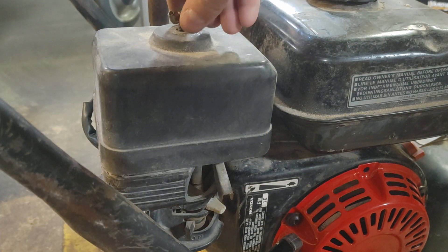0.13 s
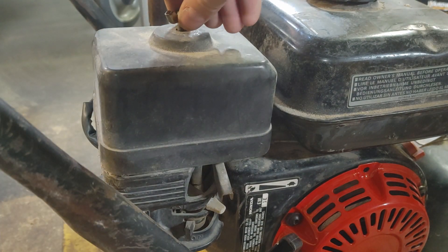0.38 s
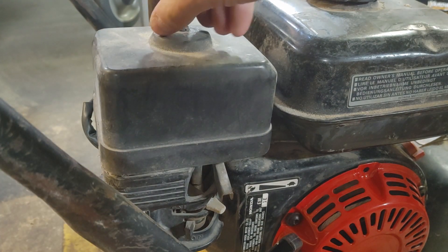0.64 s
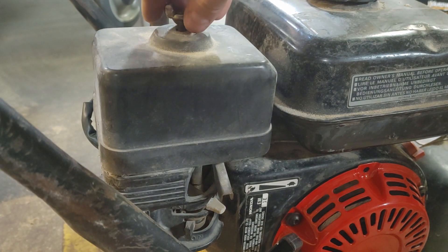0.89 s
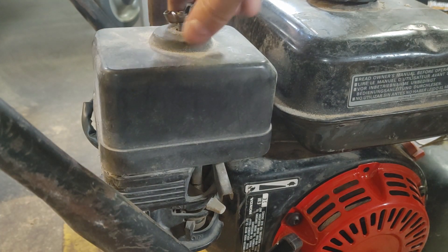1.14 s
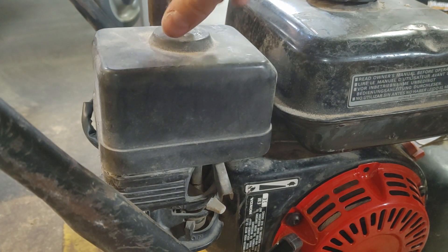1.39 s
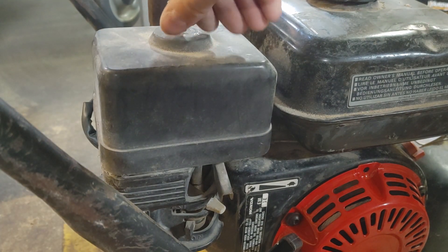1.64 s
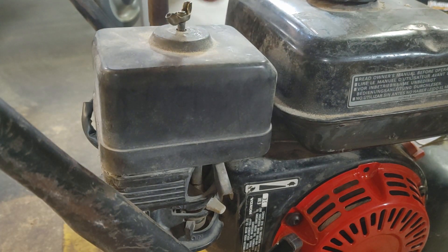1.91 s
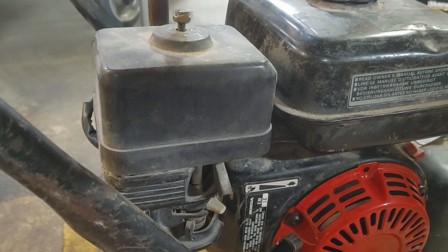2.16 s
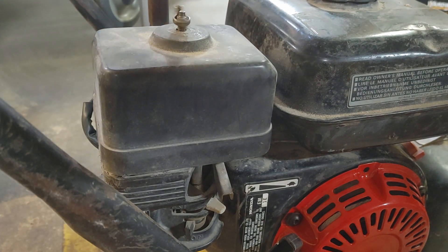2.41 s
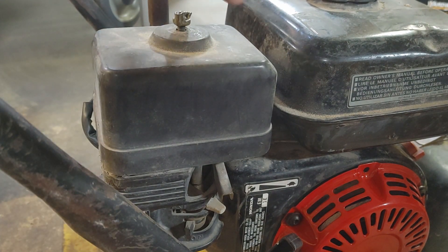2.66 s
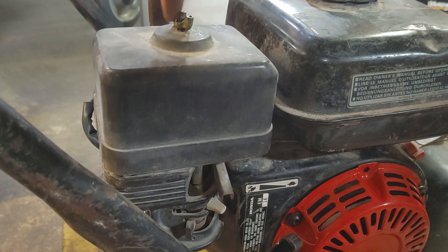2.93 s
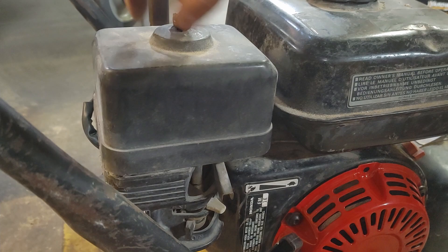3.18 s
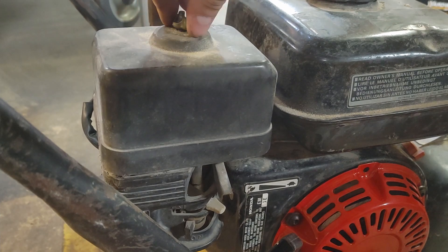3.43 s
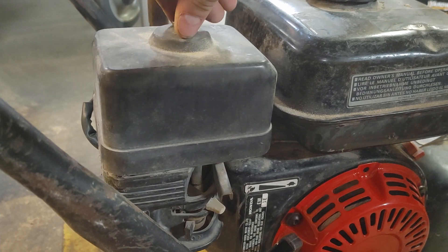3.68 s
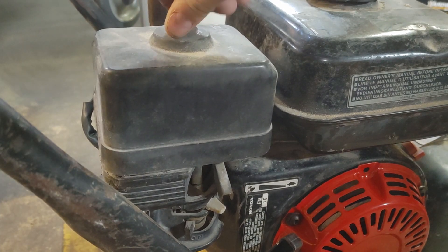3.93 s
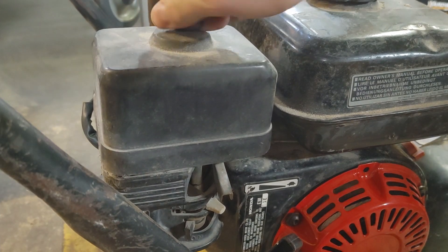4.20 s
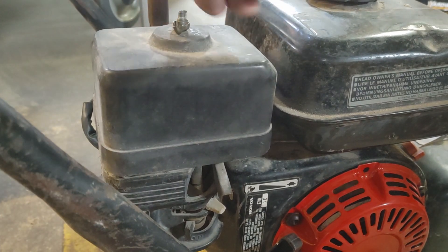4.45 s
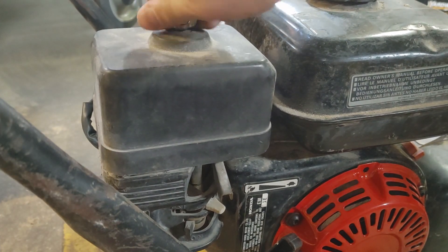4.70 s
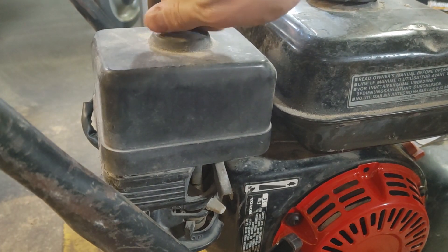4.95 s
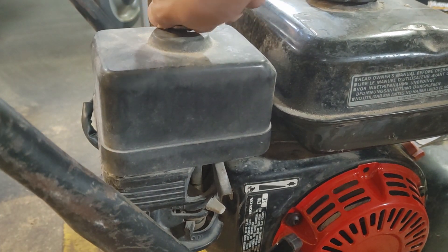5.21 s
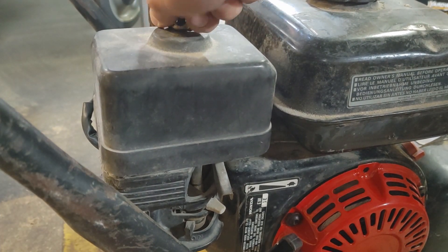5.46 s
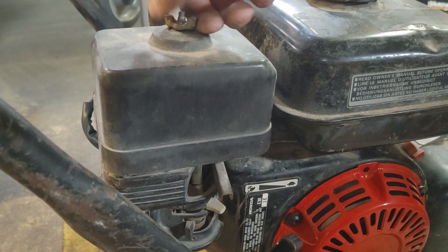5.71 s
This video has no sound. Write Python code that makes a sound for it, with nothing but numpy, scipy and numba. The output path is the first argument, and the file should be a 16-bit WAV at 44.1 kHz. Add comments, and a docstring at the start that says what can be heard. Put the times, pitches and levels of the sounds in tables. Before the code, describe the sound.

A close stereo pickup in a quiet workshop, with a low, slowly wavering murmur and faint steady hiss throughout. Faint skin rubbing opens, then a sharp metallic click at 0.8 s, followed by a weaker one at 0.9. From 1.15 to 1.85 s come small irregular ticks with thin rattles as a loose wing nut spins on its stud. The strongest clack lands at 2.1 s, ringing briefly around mid pitch with dying chatter; clusters of ticks follow at 2.3, 2.5, 2.75 and 3.0 s, with tiny gritty thread squeaks. From 3.3 s the gripping hand makes softer rubs and dull taps on the hollow plastic cover, with muffled low bumps near 3.85 and 4.17 s. Rubs and taps gather at 4.2, then a firmer scraping knock at 4.7 s. Faint rubs near 5.1 and a light tap at 5.6 s end it. Echoes are short and diffuse.

```python
"""Wing nut on a filter cover

Close by, a finger flicks a wing nut down a stud on a plastic air-filter cover, then tightens it.
Each knock and the rattle of the spinning nut ring modes of the cover, the stud and the nut.
The thread drags as narrow bands of grit, skin rubs in dense grains, the hand bumps as soft low cycles.
A quiet workshop answers with a diffuse echo; a low murmur lies under the hiss of a two-port microphone."""
import sys
import numpy as np
from scipy import signal
from scipy.fft import rfft, irfft
from scipy.io import wavfile
from scipy.ndimage import uniform_filter1d
from numba import njit

SR = 44100
rng = np.random.default_rng(int(sys.argv[2]) if len(sys.argv) > 2 else 0)


def digitize_waveform(pressure):
    """Quantize a signal to 16-bit integers and store it at the path in sys.argv[1].

    Rows of a 2-D input are taken as channels; values are limited to [-1, 1].
    """
    field = np.atleast_2d(pressure).T
    bounded = np.clip(field, -1, 1)
    quanta = np.round(bounded * 32767).astype(np.int16)
    wavfile.write(sys.argv[1], SR, quanta)


def decibels_to_gain(level_db):
    """Convert a level in decibels to a linear amplitude gain (20 dB per decade)."""
    exponent = np.asarray(level_db, float) / 20
    return 10 ** exponent


N = 257670  # samples

GRIP_S = 3.2  # from here the hand holds the nut
LOOSE_DAMPING, GRIP_DAMPING = 1.245, 2.5  # how many times faster than its listed t60 a mode dies


def rms_one(x):
    """Scale to unit rms."""
    return x / np.sqrt(np.mean(x ** 2))


def on_log_hz(table):
    """Read (Hz, value) points at every transform bin, along a logarithmic frequency axis."""
    hz, value = np.transpose(table)
    return np.interp(np.log(np.fft.rfftfreq(N, 1 / SR) + 1), np.log(hz + 1), value)


def colour(x, table):
    """Weight a signal's spectrum by (Hz, dB) points, then scale to unit rms."""
    return rms_one(irfft(rfft(x) * decibels_to_gain(on_log_hz(table)), N))


def high(x, hz):
    """Steep high-pass."""
    return signal.sosfilt(signal.butter(3, hz, "high", fs=SR, output="sos"), x)


def walk(rate):
    """Random levels, each held 1 / rate s, then smoothed twice; spread near 1."""
    hold = int(SR / rate)
    steps = np.repeat(rng.standard_normal(N // hold + 1), hold)
    return 1.3 * uniform_filter1d(uniform_filter1d(steps, hold), hold)[:N]


def grit(per_s, spread_db):
    """Scattered one-sample contacts of uneven size, unit rms."""
    hit = rng.random(N) < per_s / SR
    size = rng.standard_normal(N) * decibels_to_gain(spread_db * np.minimum(rng.exponential(size=N), 3))
    return rms_one(hit * size)


def room_tone():
    """Murmur that swells and sinks in the bass, alike at both ports, and steady unrelated hiss above."""
    # spectrum of murmur and hiss: (frequency [Hz], density [dB per Hz])
    spectrum = [(12, -39), (20, -9.5), (147, -9), (174, -19.5), (237, -10.5), (273, -13), (404, -17),
                (839, -22.5), (1180, -25.5), (2060, -29), (6910, -40.5), (7510, -48), (11800, -35),
                (15200, -38.5), (16500, -42)]
    # likeness of the two ports, read as 0 where negative: (frequency [Hz], correlation [-1 to 1])
    likeness = [(60, 1), (130, 0.97), (290, 0.78), (640, 0.38), (1410, -0.29), (3100, -0.04), (6820, -0.03),
                (15000, -0.03)]
    # the deepest rumble differs between the ports: (frequency [Hz], share of likeness kept [0 to 1])
    deep_likeness = [(30, 0.214), (100, 1)]
    # balance of the ports: (frequency [Hz], left minus right [dB])
    balance = [(60, -1), (110, 2), (200, 0), (380, 2), (700, -0.5), (1290, -1), (2380, 0.5), (4400, -2),
               (8120, 1.5), (15000, 2.5)]
    like = np.clip(on_log_hz(likeness), 0, .97) * np.clip(on_log_hz(deep_likeness), 0, 1)
    mid, side = rfft(rng.standard_normal((2, N)))
    sign = np.array([[1], [-1]])
    pair = np.sqrt(1 + like) * mid + sign * np.sqrt(1 - like) * side
    pair = pair * decibels_to_gain(sign * on_log_hz(balance) / 2)
    steady = decibels_to_gain(-67.5) * rms_one(irfft(pair * decibels_to_gain(on_log_hz(spectrum)), N))
    bass = signal.sosfilt(signal.butter(1, 500, fs=SR, output="sos"), steady)
    swell_db = 2 * walk(1.5) + 6.2 * walk(9.2)
    return bass * decibels_to_gain(swell_db) + steady - bass


def workshop(x, t60, bright_t60):
    """Diffuse echo, unrelated at the two ports; the treble dies first."""
    t = np.arange(int(.8 * SR)) / SR
    noise = rng.standard_normal((2, len(t))) * (t > .0015)
    low = signal.sosfilt(signal.butter(1, 2500, fs=SR, output="sos"), noise)
    tail = low * decibels_to_gain(-60 * t / t60) + (noise - low) * decibels_to_gain(-60 * t / bright_t60)
    return signal.fftconvolve(x, tail / np.sqrt(np.sum(tail ** 2) / 2), axes=1)[:, :N]


def bumps():
    """Soft bumps of the hand: a few low sine cycles each, with a rounded start."""
    # soft low bumps: (time [s], relative level [dB], pitch [Hz], t60 [s])
    soft_bumps = [(0.173, -50, 91.5, 0.11), (0.191, -49, 99, 0.071), (0.251, -50, 87, 0.12),
                  (0.37, -58.5, 99, 0.061), (0.638, -55, 104, 0.047), (1.785, -50, 107, 0.097),
                  (3.817, -46.5, 94, 0.067), (3.833, -40.5, 123.4, 0.055), (3.852, -36, 125, 0.053),
                  (3.867, -42.5, 119, 0.072), (3.89, -33.5, 66, 0.039), (4.167, -36.5, 146, 0.11),
                  (5.778, -45, 92, 0.046)]
    out = np.zeros(N)
    for s, level_db, hz, t60 in soft_bumps:
        i = int(s * SR)
        t = np.arange(N - i) / SR
        swing = (1 - np.exp(-t / 0.0021)) * np.sin(2 * np.pi * hz * t)
        out[i:] += decibels_to_gain(level_db - 1 - 60 * t / t60) * swing
    return out


def scrapes():
    """The thread drags and sings: grit in a narrow band at each pitch, swelling and fading."""
    # drags of the thread: (middle [s], length [s], level before the swell [dB], pitch [Hz])
    drags = [(0.813, 0.11, -55, 6600), (1.51, .06, -66, 6740), (2.582, 0.11, -53.5, 6070),
             (2.822, 0.064, -50, 2340), (3.025, 0.029, -44.5, 2150), (4.23, 0.14, -62.5, 6900),
             (4.366, 0.14, -73, 5270), (4.768, 0.054, -54, 2480), (4.777, 0.045, -58, 6410),
             (5.09, .05, -69, 6600)]
    half_width = 0.061  # natural log of frequency ratio, to each side of the pitch
    out, thread, t = np.zeros(N), grit(1200, 3.4), np.arange(N) / SR
    for s, length, db, hz in drags:
        on = np.abs(t - s) < length / 2
        edges_hz = hz * np.exp(np.array([-1, 1]) * half_width)
        band = signal.butter(2, edges_hz, "band", fs=SR, output="sos")
        swell = np.cos(np.pi * (t[on] - s) / length) ** 2
        out[on] += decibels_to_gain(db) * swell * rms_one(signal.sosfilt(band, thread[on]))
    return out


def rubs():
    """Dense stick-slip grains of skin: a bright hiss and a dull part carried by the cover."""
    # strokes of skin on nut and plastic:
    # (hardest moment [s], rise [s], fall [s], hiss level [dB], relative level of the dull part [dB])
    strokes = [(0.058, 0.48, 0.19, -70, -52), (0.523, 0.031, 0.0088, -55.5, -56.5),
               (0.759, 0.059, 0.021, -57, -53), (1.084, 0.045, 0.027, -60, -55),
               (1.315, 0.052, 0.02, -70, -55), (1.989, .03, .03, -72, -63.5),
               (3.345, 0.058, 0.029, -61.5, -56.5), (3.54, 0.055, 0.011, -63.5, -56),
               (3.676, 0.033, 0.054, -73.5, -57.5), (3.84, 0.055, 0.075, -66, -52),
               (4.035, 0.089, 0.037, -65.5, -54.5), (4.205, 0.055, 0.036, -54.5, -63),
               (4.259, 0.04, 0.028, -53.5, -45.5), (4.43, 0.031, .04, -60, -53.5),
               (4.686, 0.042, 0.044, -47.5, -44), (4.725, .03, 0.04, -61, -45),
               (4.775, 0.07, 0.025, -50, -46), (4.952, 0.052, .035, -67.5, -59.5),
               (5.095, 0.048, 0.034, -60.5, -56.5), (5.605, 0.09, .035, -70, -57.5)]
    # spectrum of the bright hiss: (frequency [Hz], density [dB per Hz])
    hiss_spectrum = [(1180, -21.5), (2000, -9.5), (2300, -14), (2640, -9), (3650, -9.5), (3910, -5),
                     (6700, -8.5), (8330, -21.5), (16000, -11.5)]
    # spectrum of the dull part: (frequency [Hz], density [dB per Hz])
    dull_spectrum = [(100, -33), (200, 1), (500, 3), (1000, -5.5), (2500, -11.5), (4000, -45)]
    edge_db, roundness = -23.5, 1.23  # level at both ends of a stroke, curve of its swell
    t = np.arange(N) / SR
    hiss_gain, dull_gain = np.zeros((2, N))
    for s, rise, fall, hiss_db, dull_db in strokes:
        on = (t >= s - rise) & (t <= s + fall)
        from_hardest = np.interp(t[on] - s, [-rise, 0, fall], [1, 0, 1])
        eased_db = edge_db * from_hardest ** roundness
        hiss_gain[on] += decibels_to_gain(hiss_db + eased_db)
        dull_gain[on] += decibels_to_gain(dull_db + .6 * eased_db)  # the dull part swells less
    hiss = colour(grit(2900, 3.), hiss_spectrum) * decibels_to_gain(2 * walk(90))
    dull = colour(grit(1500, 2.5), dull_spectrum) * decibels_to_gain(1 * walk(40))
    return hiss_gain * hiss + decibels_to_gain(-10) * dull_gain * dull


def knocks():
    """Both kinds as (s, level dB, boom dB, tick dB, stud Hz, tick Hz, rattle dB, rattle t60 s), levels relative."""
    # knocks while the nut spins loose, levels relative:
    # (time [s], level [dB], nut tick [dB], stud centre [Hz], rattle t60 [s])
    flicks = [(0.492, -52.5, -31, 890, 0.087), (0.773, -23, -6, 2000, 0.075), (0.893, -34, -10, 1350, 0.1),
              (1.036, -51.5, -15, 1550, 0.16), (1.153, -53, -11, 1560, 0.2), (1.165, -40, -16, 1180, 0.046),
              (1.382, -34.5, -4.5, 1670, 0.22), (1.41, -41, -30, 1240, 0.3), (1.477, -45, -2.5, 1950, 0.14),
              (1.486, -41.5, 1, 1910, 0.089), (1.508, -40, -43, 1480, 0.07),
              (1.626, -50, -5.5, 1770, 0.225), (1.636, -40.5, -30, 1450, 0.089),
              (1.82, -51.5, 1.5, 1566, 0.21), (1.831, -40.5, -12, 1570, 0.096),
              (2.105, -21, -1.5, 1390, 0.24), (2.122, -40.5, -7, 1530, 0.4), (2.326, -36.5, -8, 1560, 0.36),
              (2.336, -32.5, -1.5, 1340, 0.16), (2.449, -42.5, -24, 1960, 0.076),
              (2.536, -39.5, -1, 707, 0.18), (2.545, -32.5, -4, 1870, 0.091),
              (2.741, -27.5, -12, 1930, 0.4), (2.763, -31.5, 2.5, 1680, 0.12),
              (2.79, -51, -36, 1860, 0.027), (2.829, -38, -6.5, 1930, 0.1),
              (2.866, -32.5, -24, 1800, 0.043), (2.992, -29.5, -22.5, 894, 0.14),
              (3.025, -33.5, -38, 1600, 0.11)]
    # duller knocks of nut or gripping fingers on the cover, levels relative:
    # (time [s], level [dB], cover boom [dB], stud centre [Hz], rattle [dB])
    taps = [(2.952, -45, 6, 858, -2), (3.351, -48, 0.5, 732, -16), (3.532, -54, 12.5, 960, -1.5),
            (4.17, -47, 9.5, 848, -23), (4.197, -42, -0.5, 764, -1), (4.259, -40.5, -10, 842, -2),
            (4.427, -55, -5.5, 1480, -3.5), (4.589, -52, -9.5, 1820, -1.5), (4.632, -54, -10.5, 930, 7),
            (4.691, -31, -7.5, 867, -14), (4.717, -38.5, -3, 880, -3), (4.767, -51.5, -7.5, 1140, 11.5),
            (5.611, -42.5, 3, 1840, -8)]
    flick_tick_hz, tap_tick_hz = 3950, 5445  # tick pitch of the flicks and of the duller knocks
    tap_tick_db, tap_rattle_t60_s = -15, 0.074
    both = []
    for s, db, tick, hz, t60 in flicks:
        # the cover takes more of each flick as the nut runs down toward it
        boom = -26.5 + 5 * s + 0.061 * tick
        rattle = -7 - 0.3 * (db + 41)  # the chatter grows less than the blow
        both.append((s, db, boom, tick, hz, flick_tick_hz, rattle, t60))
    for s, db, boom, hz, rattle in taps:
        both.append((s, db, boom, tap_tick_db, hz, tap_tick_hz, rattle, tap_rattle_t60_s))
    return np.array(sorted(both))


@njit
def resonate(force, which, pole, left, right):
    """One mode at both ports; its pitch, decay and share change with every knock."""
    out, a, b = np.empty((2, len(force))), 0j, 0j
    for i in range(len(force)):
        k = which[i]
        a = a * pole[k] + force[i] * left[k] + 1e-18
        b = b * pole[k] + force[i] * right[k] + 1e-18
        out[0, i], out[1, i] = a.imag, b.imag
    return out


def ring(force, which, start_s, modes, centre_hz, octave_db, vary_db, detune, turn_rad):
    """Each knock favours modes near its centre, detunes them a little and varies their phase at the ports."""
    chance = rng.standard_normal((len(start_s), 3, len(modes)))
    damping = np.where(start_s > GRIP_S, GRIP_DAMPING, LOOSE_DAMPING)
    out = np.zeros((2, N))
    for k, (hz, db, t60) in enumerate(modes):
        octaves_off = np.abs(np.log2(hz / centre_hz))
        share = decibels_to_gain(db + vary_db * chance[:, 0, k] - octave_db * octaves_off)
        pitch = 2j * np.pi * hz * (1 + detune * chance[:, 1, k]) / SR
        pole = np.exp(pitch - damping * np.log(1000) / (t60 * SR))
        turn = np.exp(1j * turn_rad * chance[:, 2, k])
        out += resonate(force, which, pole, share * turn, share / turn)
    return high(out, 0.54 * modes[0][0])


def nut():
    """A faint rising noise, a crunch of milliseconds and a dying thread chatter drive cover, stud and nut."""
    # what rings, before damping and detuning: (frequency [Hz], relative level [dB], t60 [s])
    cover_modes = [(151, -14.5, 0.0059), (225, -15.5, 0.0064), (319.2, 2.5, 0.066), (411, 1.5, 0.045),
                   (514.3, -2.5, 0.26), (660.5, -13.5, 0.034)]
    stud_modes = [(749, -18, 0.014), (894, -3.5, 0.084), (1010, -11, 0.038), (1110, -14, 0.06),
                  (1240, -3.5, 0.1), (1390, -10.5, 0.12), (1530, -1.5, 0.069), (1572, 1, 0.058),
                  (1728, -10, 0.17), (1802, 3, 0.082), (1777, -39.5, 0.016), (2270, -12, 0.027),
                  (2730, -8, 0.012)]
    nut_modes = [(3462, -6, 0.014), (3886, 3.5, 0.0064), (4070, 2.5, 0.013), (4387, 3, 0.0039),
                 (5360, 2, 0.0076), (6400, -1, 0.0039), (6600, -5, 0.0041), (9100, -9.5, 0.041)]
    lead_s, knock_s = .025, .7  # the faint noise starts this long before a blow, longest knock after it
    contact_t60_s = .003  # hiss of a single contact
    t = np.arange(N) / SR
    chatter, crunch = grit(4000, 1.3), rng.standard_normal(N)
    table = knocks()
    start_s, stud_hz, tick_hz = table[:, 0], table[:, 4], table[:, 5]
    # the latest knock sets how everything rings
    which = np.clip(np.searchsorted(start_s - lead_s, t, side="right") - 1, 0, None)
    boom, body, tick, snap = np.zeros((4, N))
    for s, level_db, boom_db, tick_db, _, _, rattle_db, t60 in table:
        i = slice(int((s - lead_s) * SR), int((s + knock_s) * SR))
        age = t[i] - s
        after = np.maximum(age, 0)
        # a faint noise rising just before each blow
        lead_in = decibels_to_gain(-29) * np.exp(np.minimum(age, 0) / 0.0034) * (age < 0) * crunch[i]
        blow = decibels_to_gain(-15) * np.exp(-after / 0.0017) * (age >= 0) * crunch[i]
        # the power above 1 holds the chatter at first, then stops it faster
        rattle_fade = decibels_to_gain(rattle_db - 20.5 - 60 * (after / t60) ** 1.194)
        rattle = rattle_fade * (1 - np.exp(-after / 0.00086)) * chatter[i]
        force = decibels_to_gain(level_db) * (lead_in + blow + rattle)
        body[i] += force
        boom[i] += decibels_to_gain(boom_db) * force
        # the chatter is duller than the blow
        tick[i] += decibels_to_gain(tick_db + level_db) * (lead_in + blow + decibels_to_gain(-4) * rattle)
        # a harder blow is a shorter contact, so the top octave grows faster than the rest
        snap[i] += decibels_to_gain(3.9 * (level_db + tick_db + 30) - 42) * blow
    # the contact itself hisses in a broad band at the tick centre
    whole = np.ones(len(table), complex)
    contact_pole = np.exp(2j * np.pi * tick_hz / SR - np.log(1000) / (contact_t60_s * SR))
    contact = resonate(tick, which, contact_pole, whole, whole)
    cover_ring = ring(boom, which, start_s, cover_modes, 600.0,
                      octave_db=5.5, vary_db=-0.5, detune=0.055, turn_rad=0.28)
    stud_ring = ring(body, which, start_s, stud_modes, stud_hz,
                     octave_db=15.0, vary_db=2.5, detune=0.011, turn_rad=0.34)
    nut_ring = ring(tick, which, start_s, nut_modes, tick_hz,
                    octave_db=5.5, vary_db=2, detune=0.016, turn_rad=1.0)
    ringing = decibels_to_gain(-1.5) * cover_ring + decibels_to_gain(-6) * stud_ring + decibels_to_gain(3.0) * nut_ring
    direct = decibels_to_gain(2.0) * high(tick, 4100.0) + decibels_to_gain(12.5) * high(snap, 11000.0)
    return ringing + decibels_to_gain(9.5) * high(contact, 4100.0) + direct


def scene():
    """Nut, skin and thread reach the left port first, then the walls answer; bumps lean left."""
    near = nut() + rubs() + scrapes()
    near[1] = np.roll(near[1], 5)  # samples by which the right port hears them later
    echo = decibels_to_gain(-7.5) * workshop(near, t60=0.21, bright_t60=0.11)
    bumps_pan_db = np.array([[3.], [-3.]])
    return near + echo + decibels_to_gain(bumps_pan_db) * bumps() + room_tone()


def top_cut(x):
    """Nothing passes above the cut-off."""
    return signal.sosfilt(signal.butter(12, 16820, fs=SR, output="sos"), x)


def record(dry):
    """The microphone drops the deepest bass and the very top."""
    low_cut = high(dry, 44.0)
    mix = signal.sosfilt(signal.ellip(8, .2, 60, 15900, fs=SR, output="sos"), low_cut)
    return top_cut(mix)


dry = scene()
out = record(dry)
digitize_waveform(out)
```